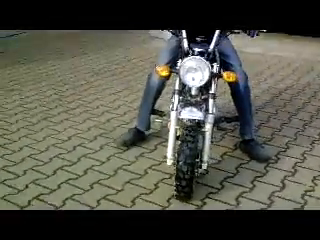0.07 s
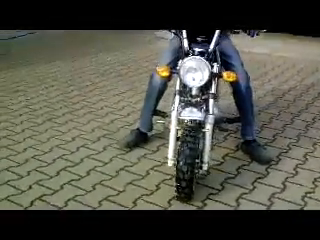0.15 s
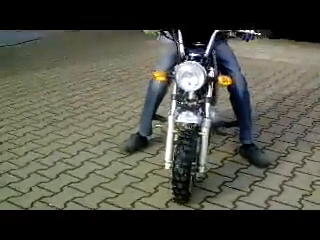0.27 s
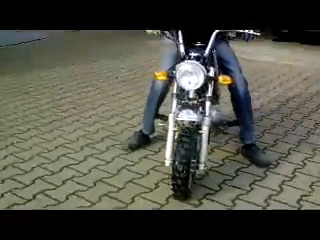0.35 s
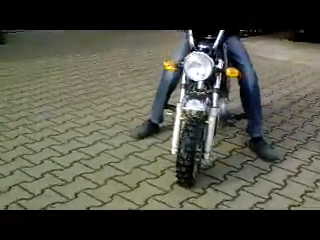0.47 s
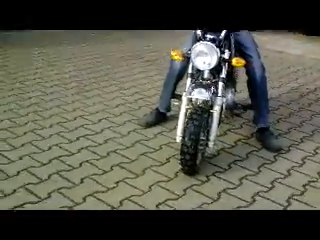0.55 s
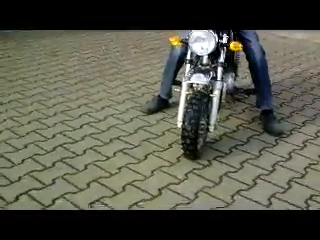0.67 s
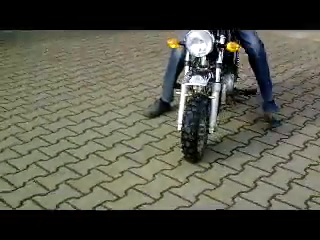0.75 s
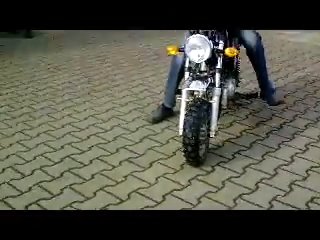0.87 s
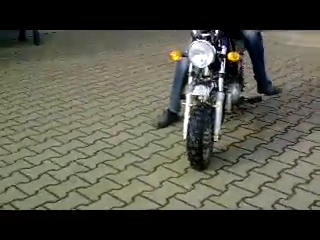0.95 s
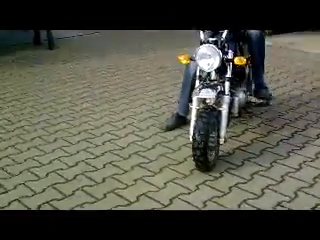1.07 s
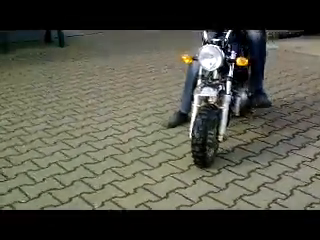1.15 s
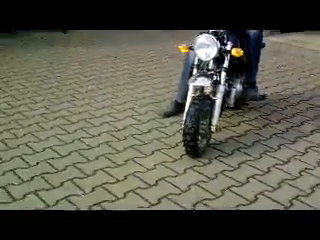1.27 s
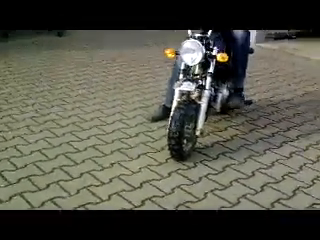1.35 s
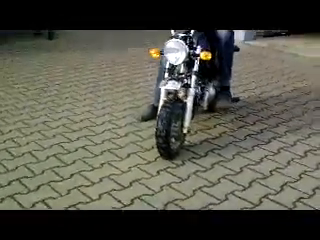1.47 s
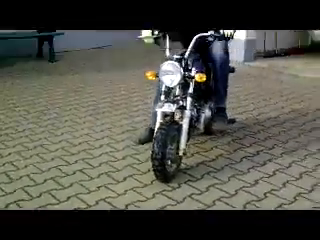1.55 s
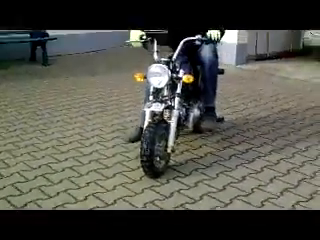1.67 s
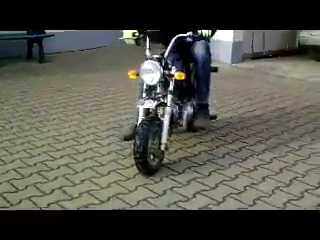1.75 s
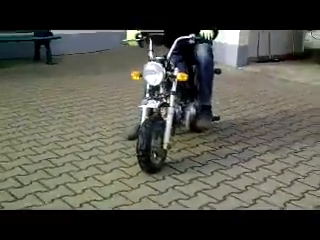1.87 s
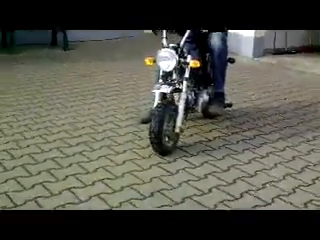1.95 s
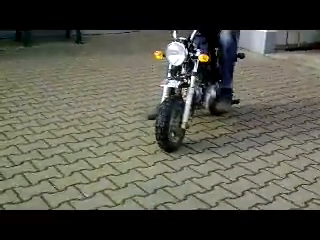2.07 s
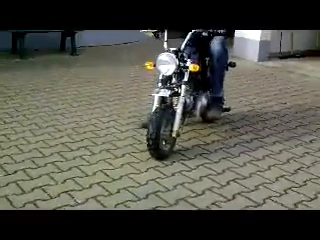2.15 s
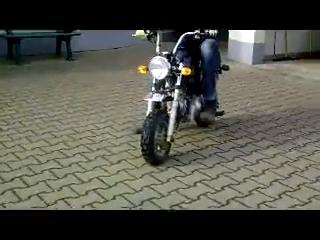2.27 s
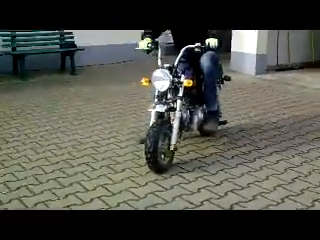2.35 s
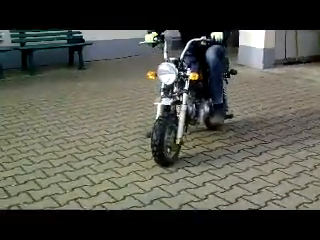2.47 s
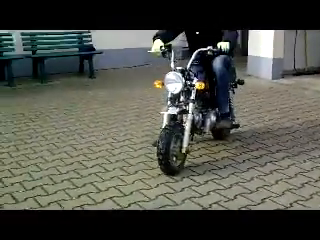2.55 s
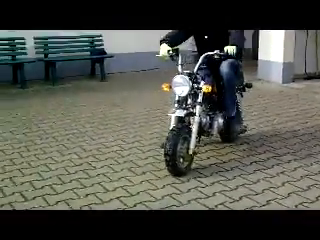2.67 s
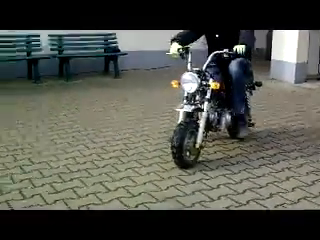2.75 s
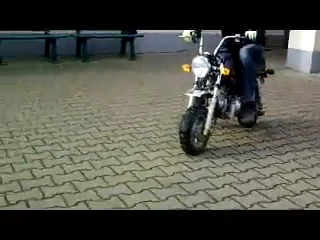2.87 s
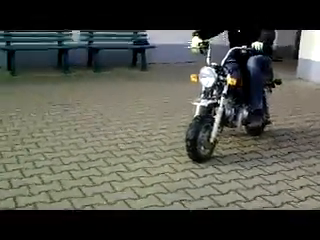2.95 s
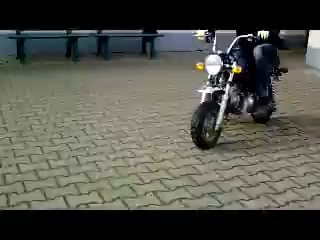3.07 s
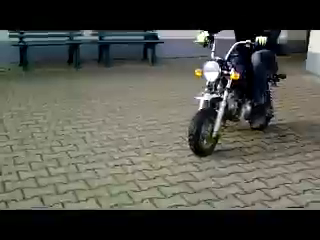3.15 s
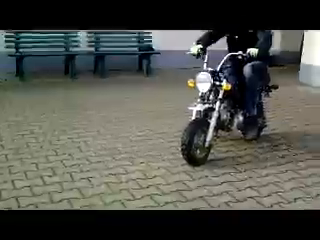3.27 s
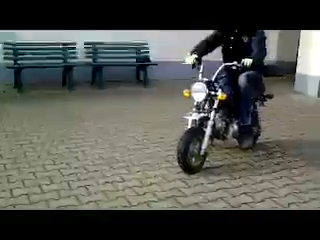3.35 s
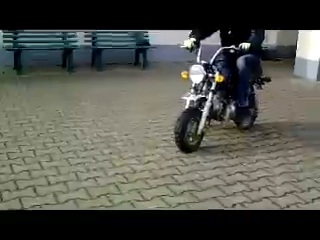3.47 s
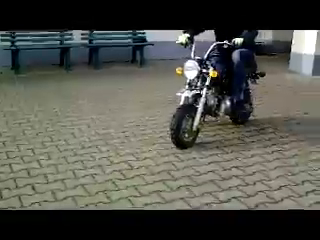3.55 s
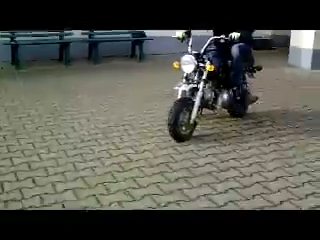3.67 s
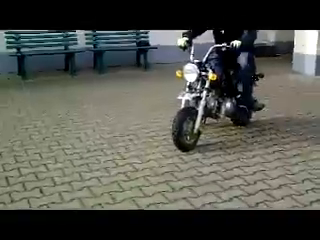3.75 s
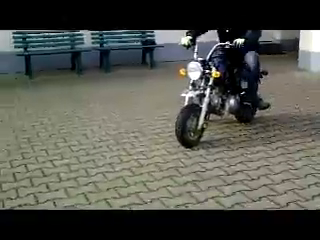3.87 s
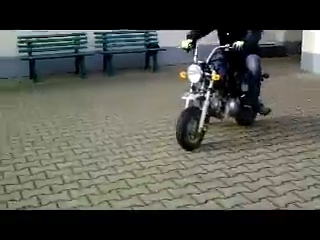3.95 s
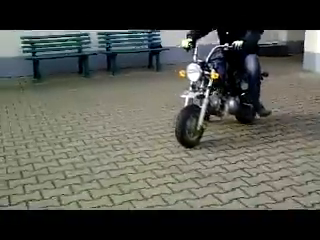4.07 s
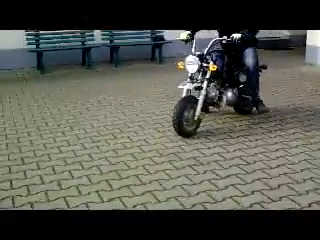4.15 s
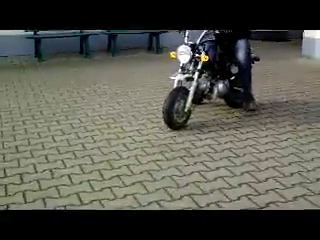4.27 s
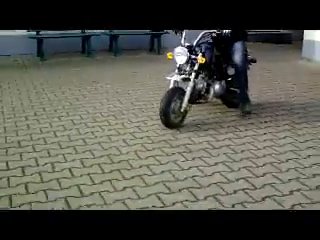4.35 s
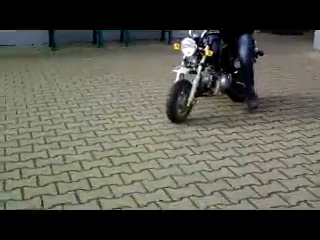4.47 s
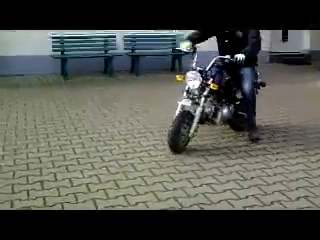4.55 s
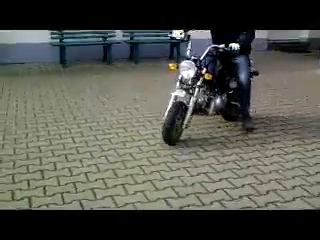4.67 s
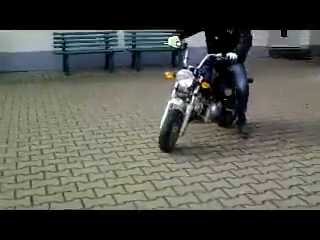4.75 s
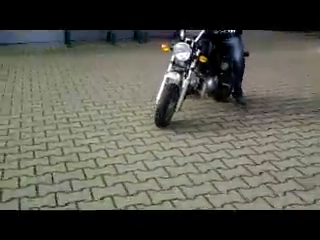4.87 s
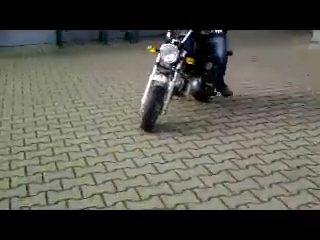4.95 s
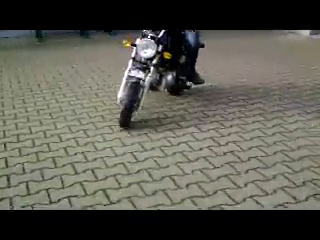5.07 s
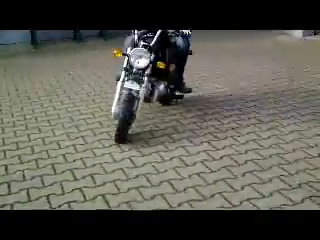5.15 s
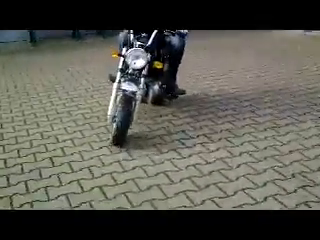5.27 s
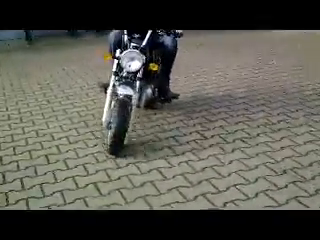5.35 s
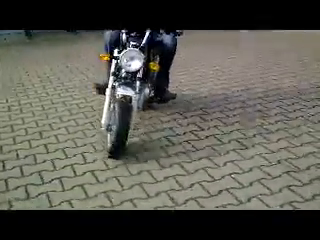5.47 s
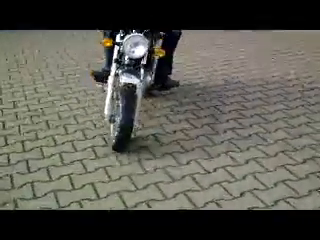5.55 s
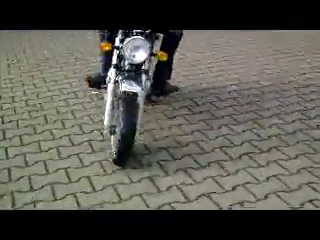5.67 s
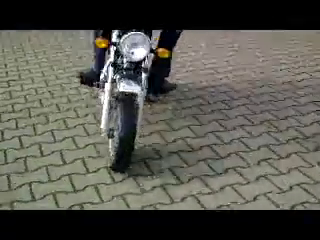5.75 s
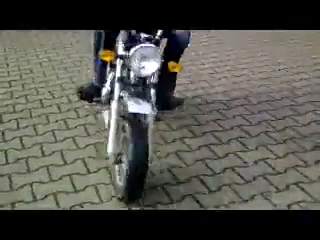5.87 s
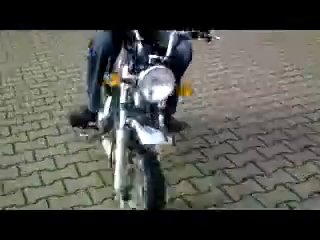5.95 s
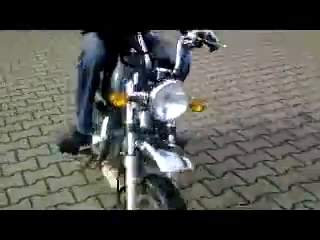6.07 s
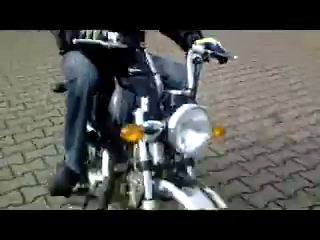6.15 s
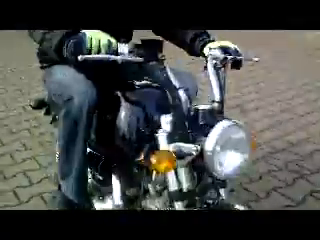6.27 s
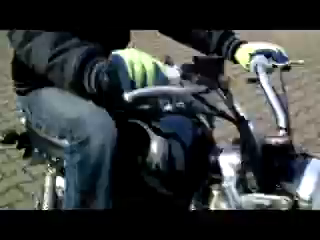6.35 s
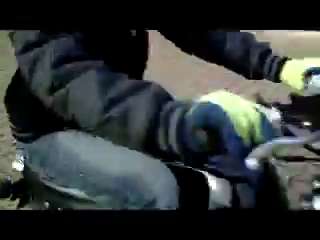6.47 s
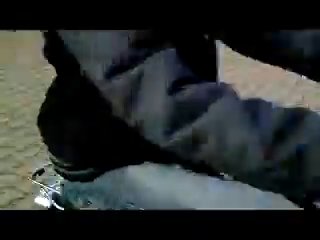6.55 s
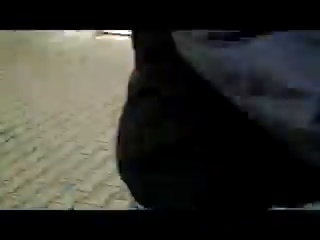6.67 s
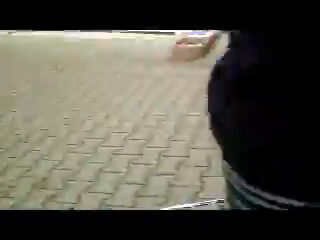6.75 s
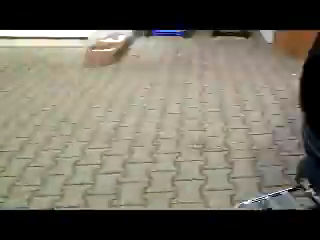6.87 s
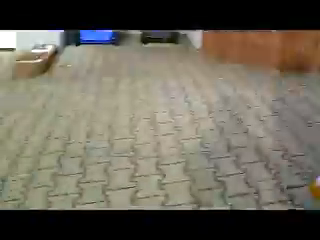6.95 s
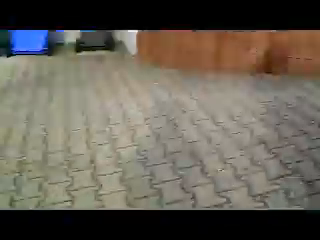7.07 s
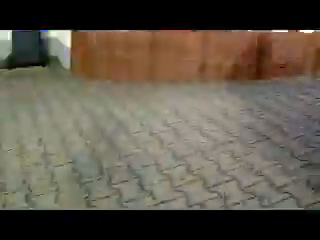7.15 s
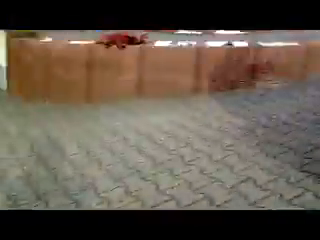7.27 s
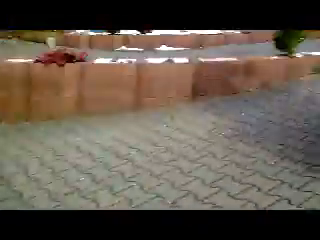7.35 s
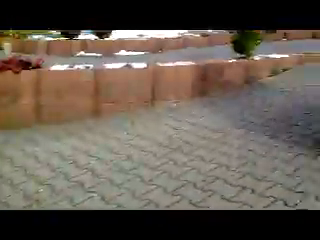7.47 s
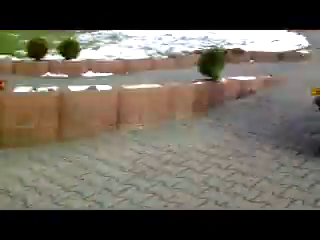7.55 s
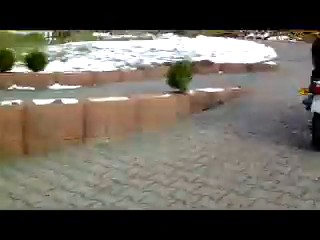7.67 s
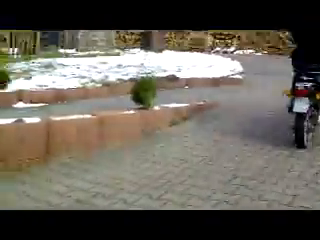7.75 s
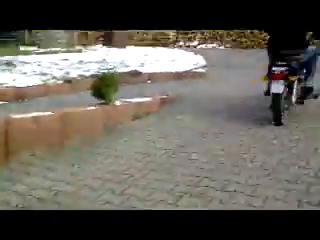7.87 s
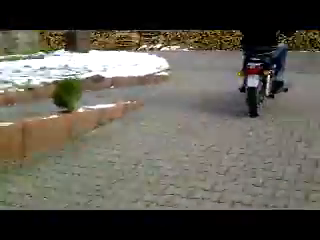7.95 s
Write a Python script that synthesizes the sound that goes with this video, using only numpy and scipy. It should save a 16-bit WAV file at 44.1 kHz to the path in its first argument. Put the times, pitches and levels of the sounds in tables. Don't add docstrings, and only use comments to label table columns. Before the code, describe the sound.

In a paved, walled yard, a small single-cylinder four-stroke gives two short throttle blips, then sinks into a slow, lumpy idle with metallic clatter and faint shoe scuffs. A third blip follows, then the engine pulls away steadily, coming closer until it roars past a single nearby microphone, its exhaust note clearer as it leaves. Short wall echoes and soft outdoor air surround it.

```python
import sys
import numpy as np
from scipy import signal
from scipy.fft import rfft, irfft
from scipy.io import wavfile
from scipy.ndimage import uniform_filter1d

SR = 44100
rng = np.random.default_rng(int(sys.argv[2]) if len(sys.argv) > 2 else 0)


def amp(db):
    return 10 ** (np.asarray(db, float) / 20)


def write(x):
    x = np.atleast_2d(x).T
    wavfile.write(sys.argv[1], SR, np.round(np.clip(x, -1, 1) * 32767).astype(np.int16))


N = 353682
TIME = np.arange(N) / SR

# (from [s], to [s])
THROTTLE = [
    (0.02, 0.145),
    (0.52, 0.645),
    (2.48, 2.6),
    (3.325, 9),
]
# (time [s], closeness [dB])
NEAR = [(0, -8), (0.45, -10), (0.75, -9.5), (1.3, -9), (1.7, -10.5), (2.3, -9.5), (2.7, -10), (3.2, -12),
        (3.6, -14), (4.3, -12.5), (5, -12.5), (5.6, -10), (5.95, -7.5), (6.2, -3), (6.7, -0.2), (7.0, -4.5),
        (7.5, -8), (8.02, -13)]
# (time [s], share [0-1])
REAR = [(5.4, 0), (5.9, .08), (6.4, .3), (6.86, .45), (6.89, 1)]
# (time [s], level [dB])
CRACKS = [
    (0.039, -21.5),
    (0.08, -41.5),
    (0.119, -41),
    (0.537, -22.5),
    (0.579, -25.5),
    (0.616, -20),
    (2.51, -28),
    (2.57, -24),
    (3.345, -29),
    (3.401, -23.5),
]
# (frequency [Hz], level [dB per Hz])
METAL = [(710, -43.5), (1200, -3), (1410, -2), (1520, -7.5), (1880, -4.5), (2110, -4), (2730, -13),
         (3040, -17), (5020, -19), (6020, -22.5), (7850, -32), (8910, -28.5), (10300, -36.5),
         (10600, -46.5), (13800, -64.5), (22000, -120)]
# (frequency [Hz], level [dB per Hz])
SOLE = [(350, -40), (600, -24), (819, 4.5), (1310, -15.5), (2380, -10), (3060, -22.5), (3930, -21.5),
        (8460, -40.5), (10500, -78), (13600, -101), (22000, -120)]


def evened(x):
    return x / np.sqrt(np.mean(x ** 2) + 1e-20)


def read(points, hz):
    f, value = np.transpose(points)
    return np.interp(np.log(hz + 1), np.log(f + 1), value)


def curves(rows, when=TIME):
    s, *columns = np.transpose(rows)
    return [np.interp(when, s, c) for c in columns]


def coloured(x, points, tilt_db=0., bump_hz=1000., bump_db=0.):
    hz = np.fft.rfftfreq(len(x), 1 / SR)
    bump = bump_db * np.exp(-(np.log2((hz + 1) / bump_hz) / .3) ** 2)
    tilt = tilt_db * np.log2((hz + 100) / 3000)
    return irfft(rfft(x) * amp(read(points, hz) + tilt + bump), len(x))


def resonate(x, hz, width, phase=0., order=2):
    turn = np.exp(2j * np.pi * np.cumsum(hz * np.ones(N)) / SR)
    r = np.exp(-np.pi * width / SR)
    low = signal.lfilter([1], np.poly([r] * order), x / turn)
    return evened((turn * low * np.exp(1j * phase)).real)


def blend(a, b, share):
    share = np.clip(share, 0, 1)
    return np.sqrt(1 - share ** 2) * a + share * b


def add(mix, s, sound):
    part = mix[round(s * SR):][:len(sound)]
    part += sound[:len(part)]


def throttle(when, twist_s=.04):
    return sum(np.clip(np.minimum((when - a) / twist_s, (b - when) / .04) + .5, 0, 1) for a, b in THROTTLE)


def crank():
    # (time [s], gain [cycles per s])
    kicks = [
        (0.073, 4.87),
        (0.504, 10.621),
        (1.375, 3.993),
        (2.45, 10.109),
    ]
    # (time [s], lead [cycles], width [s])
    hunts = [
        (1.0, -.05, .09),
        (1.21, .07, .09),
        (1.52, -.1, .08),
        (1.72, .13, .08),
        (2.22, -.045, .06),
        (2.68, .03, .1),
        (3.04, -.05, .1),
        (3.25, .07, .05),
        (3.38, -.035, .04),
    ]
    # (time [s], gain [cycles per s])
    ride = [(3.225, 0), (3.5, 8.625), (3.703, 11.737), (3.972, 15.818), (4.239, 16.95), (4.67, 18.805),
            (4.958, 18.724), (5.075, 17.794), (5.39, 17.867), (5.6, 16.069), (5.753, 18.361),
            (6.111, 24.898), (6.429, 28.112), (6.736, 31.871), (6.977, 33.227), (7.354, 35.443),
            (7.671, 37.785), (7.959, 39.036)]
    start_rate, stall_rate = 25.361, 5.876
    coast_s, kick_s = 1.17, 0.119
    speed = stall_rate + (start_rate - stall_rate) * np.exp(-TIME / coast_s) + curves(ride)[0]
    for s, gain in kicks:
        since = np.maximum(TIME - s, 0)
        speed = speed + gain * (1 - np.exp(-since / kick_s)) * np.exp(-since / coast_s)
    ahead = sum(turn * np.exp(-((TIME - s) / width) ** 2) for s, turn, width in hunts)
    late = .105 * np.maximum(TIME - 6.75, 0)
    return speed, np.cumsum(speed) / SR + ahead - late


def level(layer, when, opened, speed):
    base_db, share, open_db, octave_db, rear_db = layer
    octaves = np.log2(np.interp(when, TIME, speed) / 25)
    near_db = share * curves(NEAR, when)[0]
    return base_db + near_db + open_db * opened + octave_db * octaves + rear_db * curves(REAR, when)[0]


def pulses(cycles, lag, uneven_db, jitter_s):
    at = np.interp(np.arange(1, int(cycles[-1])) + lag, cycles, TIME)
    chance = rng.standard_normal((len(at), 2))
    train = np.zeros(N)
    train[np.round((at + jitter_s * chance[:, 0]) * SR).astype(int)] = amp(uneven_db * chance[:, 1])
    return train


def rung(train, rush, hz, width, lead_s, phase, hiss, order=2):
    clean = resonate(np.roll(train, -round(lead_s * SR)), hz, width, phase, order)
    return blend(clean, resonate(rush, hz, width, order=order), hiss)


def burn_lift(events, fired, reach_s):
    return uniform_filter1d(sum(db * (abs(fired - s) < reach_s) for s, db in events), 120)


def tail_pipe(cycles, first, last):
    # (multiple of cycle rate, level [dB], change as it leaves [dB])
    orders = [(1, -6, 3.5), (2, -5, 6.5), (3, -22.5, -1.5), (4, -5.5, -1.5), (5, 0, -3), (6, -7, -5),
              (7, -9, -6), (8, -13, -9), (9, -7.5, 0), (10, -12.5, -1.5), (11, -13, -3), (12, -23.5, 3),
              (13, -26, 11), (14, -20.5, 2.5)]
    tone, gone = np.zeros(N), np.clip((TIME - 7.1) / .8, 0, 1)
    for k, db, change_db in orders[first - 1:last]:
        held = 1.9 * (round(k) == 6)
        strength = amp(db) * (1 + (amp(change_db) - 1) * gone)
        tone -= strength * np.sin(2 * np.pi * round(k) * (cycles + .075) - held)
    return evened(tone)


def muffler(blow, rush, rough, cycles, opened, load, rear):
    rise_hz = 22 * np.minimum(10 * rear, 1) + 25 * rear
    thump = rung(blow, rush, 162.1 + rise_hz, 190, .0033, -.3, .2 * rough, order=4)
    coast = resonate(np.roll(blow, -round(.0055 * SR)), 145, 180, -2.4, order=4)
    thump = opened * thump + (1 - opened) * (1.05 * coast + .15 * thump)
    deepest = signal.filtfilt(*signal.butter(2, 95, fs=SR), thump)
    thump = thump - .7 * load * np.clip(1 - 8 * rear, 0, 1) * deepest
    behind = uniform_filter1d(np.minimum(1.6 * rear, 1), 5000)
    thump = (1 - behind) * thump + behind * tail_pipe(cycles, first=3, last=6)
    return thump + 1.1 * behind * (1 - behind) * tail_pipe(cycles, first=3, last=3)


def pipe_bark(blow, rush, puff, rough, speed, cycles, opened, rear):
    lazy = (1 - opened) * np.clip((23 - speed) / 6, 0, 1)
    since = ((cycles + .04) % 1) / speed
    slide = 280 * lazy * np.exp(-since / .02)
    bark = rung(blow, rush, 385 + 110 * lazy - slide, 175, .0022, -2.2, 1.295 * rough)
    emptying = np.exp(-since / .021) * rush / puff
    bark = bark + amp(-2) * lazy * resonate(emptying, 480 - slide, 95)
    return blend(bark, tail_pipe(cycles, first=7, last=14), np.minimum(1.6 * rear, .94))


def air_box(gulp, rush, rough, second, load, rear):
    # (time [s], ring pitch [Hz], ring level [dB], upper ring [dB], lasting ring [dB])
    passing = [(0, 595, 0.5, -2, -12.5), (0.8, 612, 1, -2, -4.5), (1.4, 638.3, -0.5, -1, 2),
               (1.7, 595.3, 0.5, -3, -12.5), (3.3, 608, 2.5, -4.5, -20.5), (3.75, 706.6, 1, -3.5, -7),
               (4.0, 680, 1.5, -6.5, -9), (4.5, 653, 0.5, -7.5, -3.5), (4.92, 646, -1.5, -2, -3),
               (5.05, 654.6, -2.5, -5.5, -33), (5.5, 650, -0.5, 0, -8), (5.85, 702, -0.5, 1.5, -1),
               (6.2, 737, -0.5, -3.5, -4), (6.6, 730.4, -0.5, -2, -13), (6.72, 806, -0.5, -2, -14),
               (6.85, 848, 1.5, -1.5, -28), (6.92, 818, 0.5, 4, -8), (8.02, 839, 0.5, 3, -12.5)]
    ring_hz, swell_db, upper_db, lasting_db = curves(passing)
    shut = 1 + 2.2 * second
    ring = rung(gulp, rush, ring_hz, 145, .0015, -3, (.8 * shut - .3 * load) * rough, order=3)
    broad = rung(gulp, rush, ring_hz, 300, .0018, .3, .55 * rough, order=3)
    ring = blend(ring, broad, 2.8 * rear)
    upper_hz = 880 + 95 * load + 85 * rear ** 4
    upper = rung(gulp, rush, upper_hz, 360, .0011, 1.1, (1.4 * shut - .6 * rear ** 4) * rough)
    ring = (ring + amp(upper_db) * upper) / np.sqrt(1 + amp(upper_db) ** 2)
    lasting = rung(gulp, rush, 655, 62, .001, -1.5, .33 * shut ** 1.5 * rough)
    ring = ring + amp(lasting_db - 3) * lasting
    ring = ring + amp(-7.5 - 7.2 * load) * resonate(rush, 521.5, 130)
    ring = ring + amp(-10) * rear ** 4 * resonate(rush, 734, 160)
    snap_hz = 2035 + 400 * rear * (1 - 0.52 * rear)
    snap = rung(gulp, rush, snap_hz, 340, 0.00051, 0.14, 0.6 * shut * rough)
    return amp(swell_db) * ring + amp(-20.5 - 8 * rear - 8 * rear ** 2) * snap


def pipe_mouth(cycles):
    tones = tail_pipe(cycles, first=9, last=10) + 2.5 * tail_pipe(cycles, first=11, last=11)
    return amp(-38) * np.exp(-((TIME - 6.8) / .19) ** 2) * tones


def gas_pulses(speed, cycles):
    # (time [s], lift [dB])
    chuffs = [(1.35, -1.5), (1.395, 1), (1.45, -5), (1.5, -2), (1.6, -2), (1.655, -3), (1.72, -4.5),
              (1.83, -4), (1.95, 2.5), (2.015, -6), (2.08, 0), (2.15, -2), (2.29, 2), (2.36, -11),
              (2.44, 2), (2.62, 3.5), (2.84, 2), (2.9, -6.5), (2.96, 2.5), (3.02, -8), (3.085, 2.5),
              (3.15, -13), (3.21, 3), (3.28, 1.5)]
    # (time [s], lift [dB])
    burns = [(5.819, -4.5), (5.892, -0.5), (5.996, -2.5), (6.127, 2.5), (6.159, 1.5), (6.22, -0.5),
             (6.25, -4), (6.31, -4), (6.34, -1.5), (6.4, 0.5), (6.428, 1.5), (6.541, 0.5), (6.625, 4.5),
             (6.756, -1), (6.862, 2.5)]
    # (base level [dB], share of closeness, open throttle [dB],
    # speed [dB per octave], seen from behind [dB])
    thump_layer = (-35, 0.57, 9, 7, -3)
    bark_layer = (-39, 0.8, 1.5, 9.5, 3.5)
    ring_layer = (-40, 0.94, 8.5, 11.5, -7)
    low_layer = (-32, 1.5, -2, 2, 6.5)
    opened, rear = throttle(TIME), curves(REAR)[0]
    load = np.clip((TIME - THROTTLE[-1][0]) / .5, 0, 1)

    fired = np.interp(np.floor(cycles + .15), cycles, TIME)
    burn = uniform_filter1d(fired, 120)
    burn_open = throttle(burn)
    hard_db = burn_lift([(s, db + 28) for s, db in CRACKS], fired, .012)
    catch_db = burn_lift(chuffs, fired, .022)
    thump_db = level(thump_layer, burn, burn_open, speed) + 0.18 * hard_db + 0.5 * catch_db
    bark_db = level(bark_layer, burn, burn_open, speed) + catch_db
    ring_db = level(ring_layer, burn, burn_open, speed) + 0.15 * hard_db + burn_lift(burns, fired, .013)
    ring_db = ring_db - 3.54 * burn_open * (1 - load)
    low_db = uniform_filter1d(level(low_layer, burn, burn_open, speed), size=5000)

    second = .75 - .55 * opened - .13 * load
    lead = .3 * rear * (1 - .87 * rear)
    late = second * pulses(cycles - .025 * (1 - opened), .23, 1.6, .0002)
    even = np.sqrt(speed * (1 + second ** 2))
    blow = (pulses(cycles, 0, .7, .00004) + late) / even
    gulp = (pulses(cycles + lead, 0, .9, .00006) + late) / even
    scatter = rng.standard_normal(1300) * np.exp(-np.arange(1300) / 500)
    scattered = signal.oaconvolve(gulp, scatter / np.linalg.norm(scatter))[:N]
    gulp = blend(gulp, scattered, .4 * rear + .2 * rear ** 4)

    rough = .29 + (1 - opened) * np.clip(.05 + .045 * (24 - speed), .05, .28) + .04 * rear ** 4
    puff = .24 + .4 * rear ** 4 + np.exp(-((cycles + lead + .05 + .2 * rear ** 4) % 1) / .22)
    rush = puff * rng.standard_normal(N)

    thump = muffler(blow, rush, rough, cycles, opened, load, rear)
    bark = pipe_bark(blow, rush, puff, rough, speed, cycles, opened, rear)
    ring = air_box(gulp, rush, rough, second, load, rear)
    rumble = amp(-30 * rear) * resonate(rush, 31, 57)
    low = blend(rumble, tail_pipe(cycles, first=1, last=2), 3 * rear)
    gas = pipe_mouth(cycles) + amp(bark_db) * bark + amp(ring_db) * ring
    return gas, amp(thump_db) * thump + amp(low_db) * low


def cracks():
    # (frequency [Hz], level [dB per Hz])
    pop_colour = [(290, -31), (520, -5), (850, 4), (1300, -0.5), (1600, -12), (2300, -11), (3470, -31),
                  (5140, -29.5), (7070, -51), (9130, -41), (10500, -55), (13600, -65), (22000, -120)]
    out, t = np.zeros(N), np.arange(3000) / SR
    for s, db in CRACKS:
        pop, hiss = rng.standard_normal((2, len(t)))
        pop = 0.28 * pop * np.exp(-t / 0.00097) - np.exp(-t / 0.00049)
        pop = coloured(np.pad(pop, 300), pop_colour, 0.5)
        hiss = evened(coloured(hiss, METAL, 1.0)) * np.exp(-t / 0.0152)
        add(out, s - 250 / SR, amp(db) * pop / abs(pop).max())
        add(out, s, amp(db - 24.5) * hiss)
    return out


def pings():
    # (time [s], peak level [dB], pitch [Hz])
    rings = [(5.8922, -34, 2142), (5.9277, -40, 1870), (5.9636, -34, 2336), (5.993, -42, 2200),
             (6.0324, -37, 1810), (6.0648, -28.5, 2174), (6.0958, -27, 2240), (6.1272, -35, 2060),
             (6.1591, -32, 2360), (6.1906, -26.5, 2265), (6.2215, -29, 2113), (6.2524, -34, 2150),
             (6.2779, -27.5, 2100), (6.3128, -22, 2130), (6.3417, -20.5, 2020), (6.3711, -24, 1820),
             (6.4006, -27.5, 2550), (6.4285, -23, 2130), (6.4565, -31, 2150), (6.4859, -31, 2030),
             (6.5148, -25, 2140), (6.5353, -26.5, 1950), (6.5712, -23, 2080), (6.5981, -19, 2080),
             (6.6251, -24, 2088), (6.6779, -24, 2260), (6.7024, -26, 1890), (6.7278, -24, 1780),
             (6.7578, -24, 1750), (6.8316, -29, 2050), (6.863, -24, 2060), (6.887, -28, 2110)]
    out, t = np.zeros(N), np.arange(800) / SR
    shape = (1 - np.exp(-t / .0006)) * np.exp(-t / .0027)
    for s, db, hz in rings:
        add(out, s, amp(db - 2) * shape / shape.max() * np.sin(2 * np.pi * hz * t))
    return out


def clatter(speed, cycles):
    # (base level [dB], share of closeness, open throttle [dB], speed [dB per octave], from behind [dB])
    case_layer = (-47, 1.34, 6.5, 11, -1.5)
    level_db = level(case_layer, TIME, throttle(TIME, .5), speed)
    beat = np.clip(0.58 + 0.0144 * curves(NEAR)[0] - 0.2 * curves(REAR)[0] ** 4, 0, 1)
    burst = np.exp(-((cycles + 0.033) % 1) / 0.11) + 0.15 * np.exp(-((cycles + 0.35) % 1) / 0.027)
    stray = amp(1.8 * np.minimum(rng.exponential(1, N), 4)) * (rng.random(N) < 250 / SR)
    stray = signal.lfilter([1], [1, -.985], stray)
    rasp = rng.standard_normal(N)
    shake = (1 - beat + 3.15 * beat * burst + 0.36 * evened(stray)) * rasp
    cases = evened(coloured(shake, METAL))
    cases = cases + 0.19 * resonate(rasp, 2053, 200) + 0.146 * resonate(shake, 1599, 140)
    return amp(level_db + 2.0) * evened(cases)


def scuffs():
    # (time [s], level [dB], drag [s], tilt [dB per octave], grit pitch [Hz], grit lift [dB])
    steps = [
        (2.086, -44.5, 0.096, 4, 2860, 3.5),
        (3.001, -45, 0.096, 1.5, 1210, 8.5),
        (3.173, -50.5, 0.07, 6.5, 5260, 9),
        (4.3, -58, 0.013, -3, 3410, 8),
    ]
    out = np.zeros(N)
    for s, db, drag, *colour in steps:
        t = np.arange(round(3.1 * drag * SR)) / SR
        grain = evened(uniform_filter1d(rng.standard_normal(len(t)), 90))
        grit = amp(2 * grain) * rng.standard_normal(len(t))
        shape = np.exp(-(t / (0.45 * drag)) ** 2) + 0.45 * np.exp(-t / 0.0013)
        add(out, s, amp(db) * evened(coloured(grit, SOLE, *colour)) * shape)
    return out


def ticks():
    # (time [s], level [dB])
    knocks = [
        (0.734, -44),
        (1.2907, -35),
        (1.931, -45),
        (5.89, -31),
    ]
    out, t = np.zeros(N), np.arange(300) / SR
    sharp = np.exp(-t / .0007)
    for s, db in knocks:
        tick = coloured(np.pad(sharp * rng.standard_normal(len(t)), 100), SOLE, 2.4)
        add(out, s - 100 / SR, amp(db + 2.5) * tick / abs(tick).max())
    return out


def paving(x):
    dipped = signal.lfilter(*signal.iirnotch(255, 3, SR), x)
    return x + 0.7 * np.exp(-((TIME - 6.75) / 0.22) ** 2) * (dipped - x)


def yard(x):
    # (frequency [Hz], time to fall 60 dB [s])
    decay = [(100, 0.125), (600, 0.37), (3000, 0.11), (9000, 0.097)]
    # (delay [s], level [dB])
    walls = [(0.013, -11), (0.018, -3.5), (0.028, -11.5), (0.043, -22)]
    taps = np.zeros(SR // 2)
    at = np.arange(1000, len(taps) - 20, 20)
    taps[at + rng.integers(0, 20, len(at))] = rng.choice([-1., 1.], len(at))
    hz, t, z = signal.stft(taps, SR, nperseg=256)
    tail = signal.istft(z * amp(-60 * t / read(decay, hz)[:, None]), SR, nperseg=256)[1]
    tail /= np.linalg.norm(tail)
    for s, db in walls:
        add(tail, s, amp(np.array([db])))
    return signal.fftconvolve(x, tail)[:N]


def lingering():
    return amp(-39.5) * np.exp(-(TIME / 0.041) ** 4) * resonate(rng.standard_normal(N), 560, 540)


def open_air():
    # (frequency [Hz], level [dB per Hz])
    air_colour = [(15, -39), (25, -14), (86, -9.5), (155, 8.5), (426, -12.5), (577, -25), (843, -0.5),
                  (1470, -24.5), (2380, -19.5), (7070, -35), (10600, -68), (13800, -102), (22000, -120)]
    return amp(-53.5) * evened(coloured(rng.standard_normal(N), air_colour))


def scene():
    speed, cycles = crank()
    gas, deep = gas_pulses(speed, cycles)
    near = gas + clatter(speed, cycles) + cracks() + scuffs() + ticks() + pings()
    far_db = -.55 * curves(NEAR)[0]
    thrown = amp(-17.5 + far_db) * near + amp(-16 - 3.3 * curves(REAR)[0]) * deep
    mid = paving(near + deep) + yard(thrown) + open_air() + lingering()
    return np.array([mid, mid])


def patchy(x):
    hz, t, z = signal.stft(x, SR, nperseg=1024)
    band = np.round(9 * np.log(1 + hz / 1500)).astype(int)
    share = .13 * (.6 + 3 * (abs(hz - 2650) < 350))
    lots = np.repeat(rng.random((len(t) // 3 + 1, band[-1] + 1)), 3, axis=0)
    lots = lots[:len(t), band].T
    return signal.istft(z * (lots < share[:, None]), SR, nperseg=1024)[1][:N]


def side_difference(x):
    # (frequency [Hz], side minus middle [dB])
    side_colour = [(60, -42.5), (110, -41), (190, -47.5), (330, -45), (590, -40.5), (1040, -33),
                   (1840, -38), (3250, -22.5), (5740, -22.5), (10200, -28.5)]
    smear = rng.standard_normal(400) * np.hanning(400)
    smeared = signal.oaconvolve(x, smear / np.linalg.norm(smear), "same")
    return amp(9.5) * patchy(coloured(smeared, side_colour))


def gate_top(x):
    # (frequency [Hz], ...)
    edges_hz = (9100, 9900, 10650)
    # (level [dB], ...)
    gates_db = (-88, -89.5)
    below = [signal.oaconvolve(x, signal.firwin(255, hz, fs=SR)[None], "same") for hz in edges_hz]
    out = below[0]
    for low, high, gate_db in zip(below, below[1:], gates_db):
        loud = uniform_filter1d((high - low)[0] ** 2, size=1024) > amp(gate_db) ** 2
        out = out + uniform_filter1d(1. * loud, size=512) * (high - low)
    return out


def roll_off(x):
    return signal.sosfilt(signal.butter(12, 10750, fs=SR, output="sos"), x)


def record(dry):
    side = side_difference(dry[0])
    rounded = .42 * np.tanh(dry / .42)
    return roll_off(gate_top(rounded + np.array([side, -side])))


dry = scene()
out = record(dry)
write(out)
```